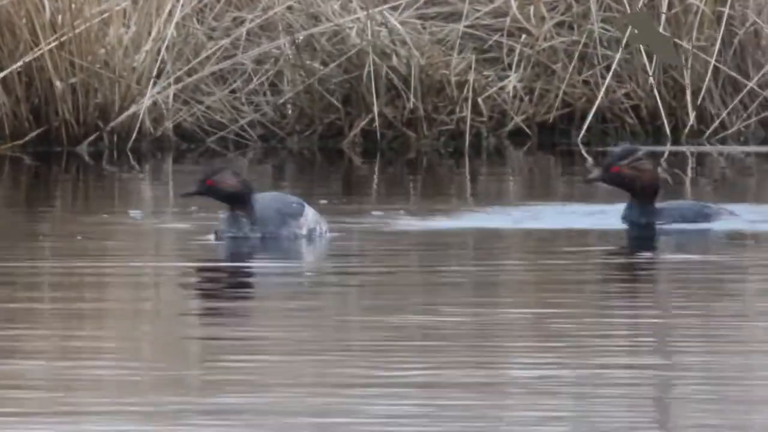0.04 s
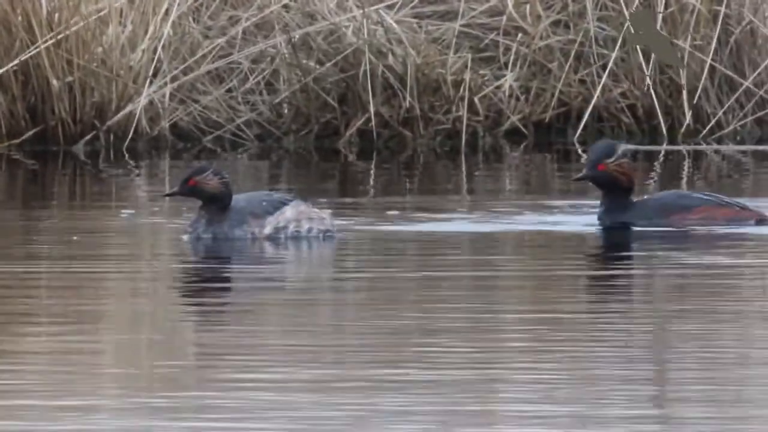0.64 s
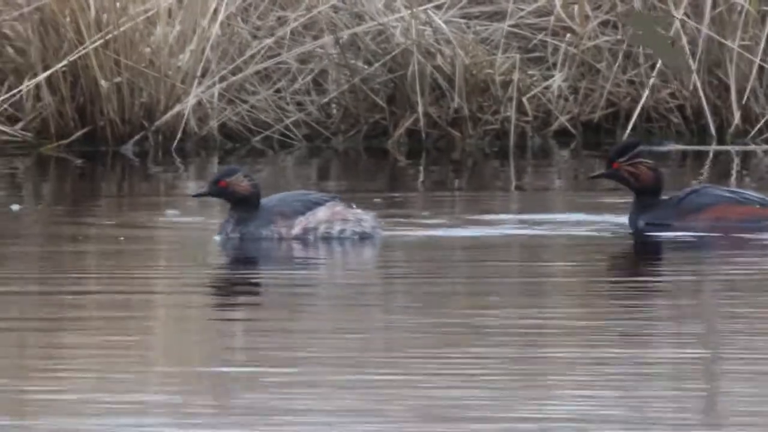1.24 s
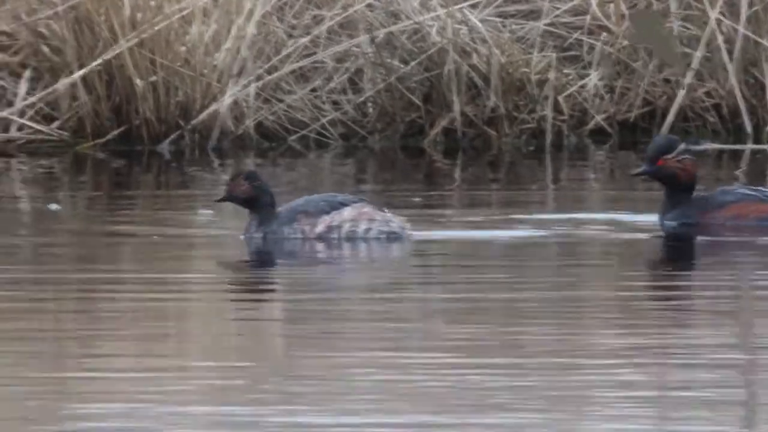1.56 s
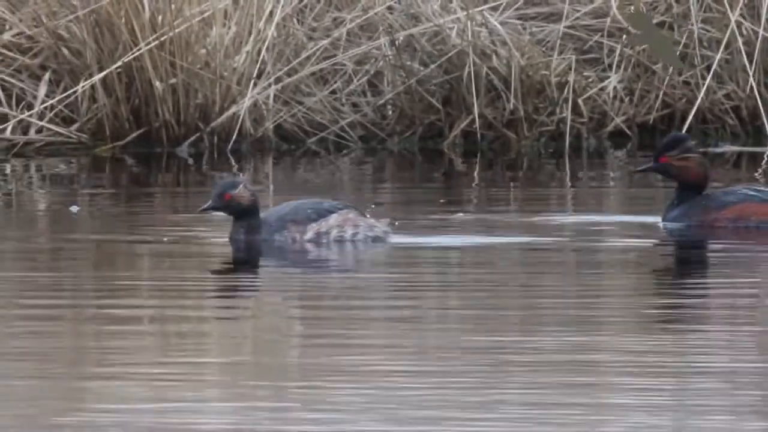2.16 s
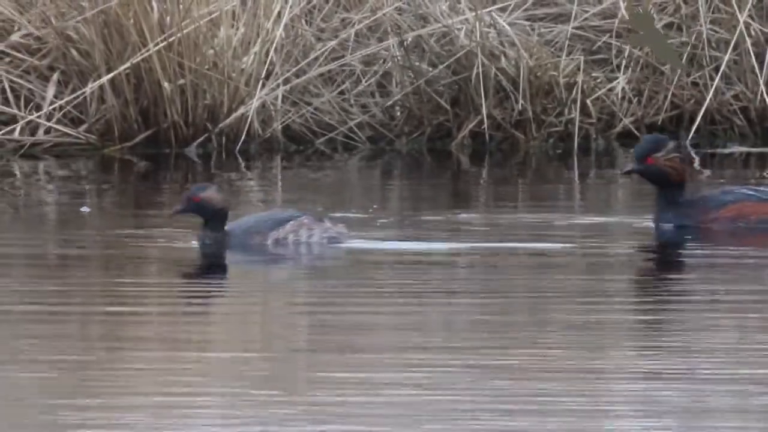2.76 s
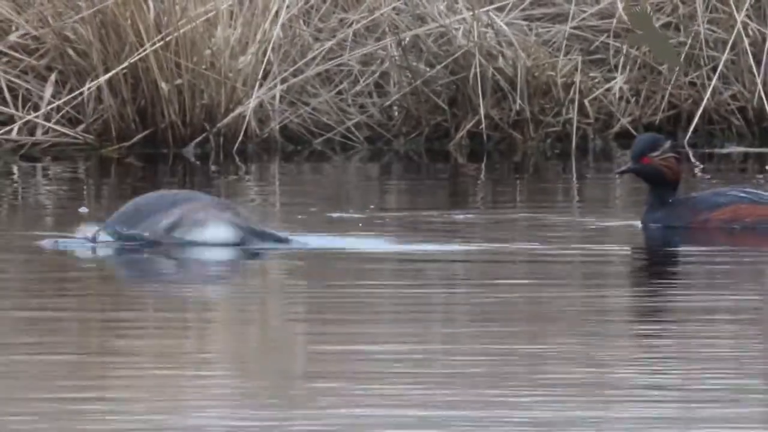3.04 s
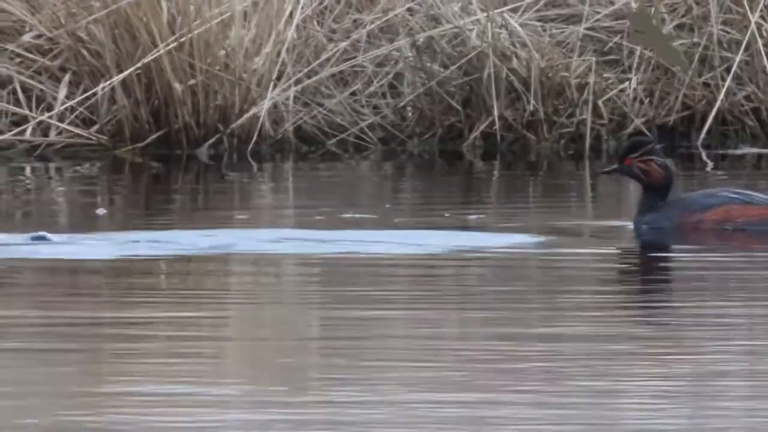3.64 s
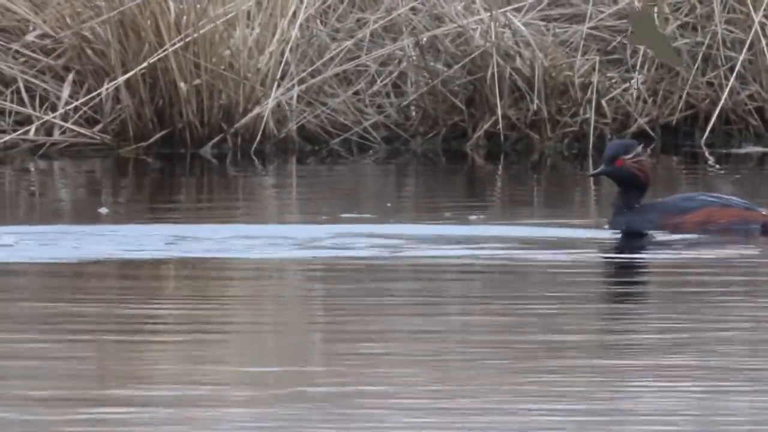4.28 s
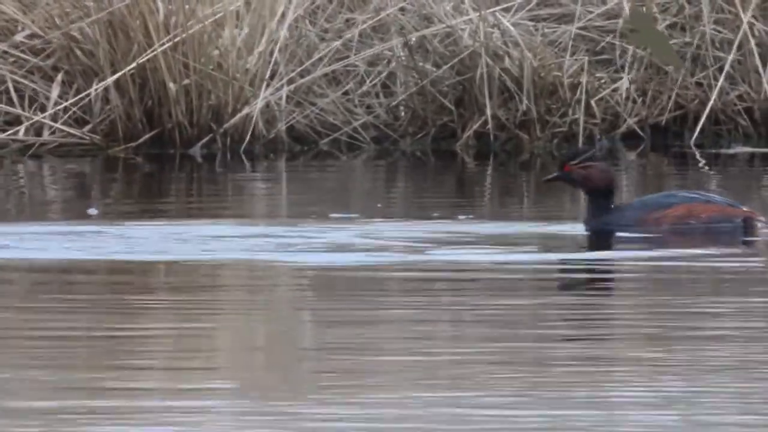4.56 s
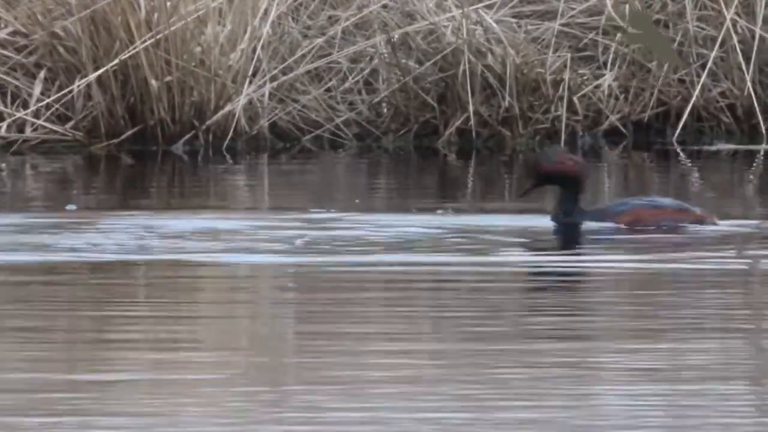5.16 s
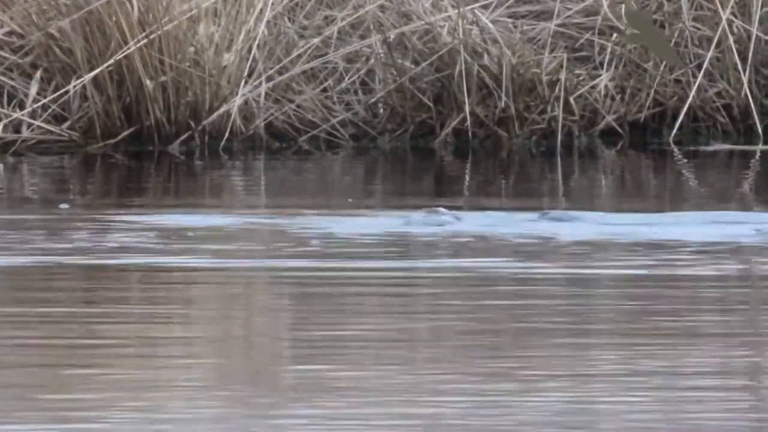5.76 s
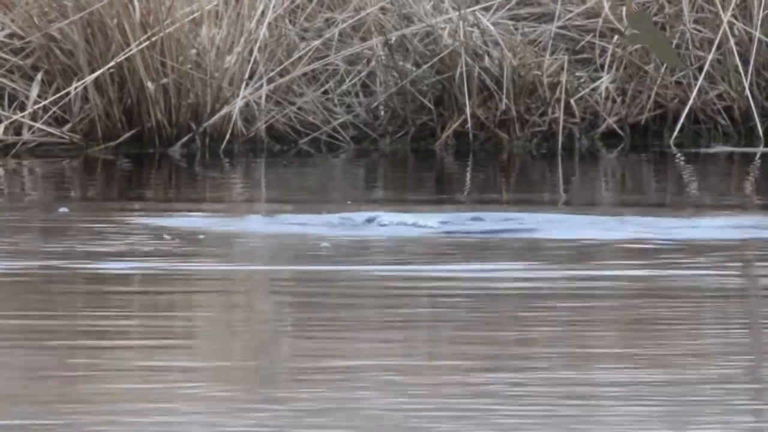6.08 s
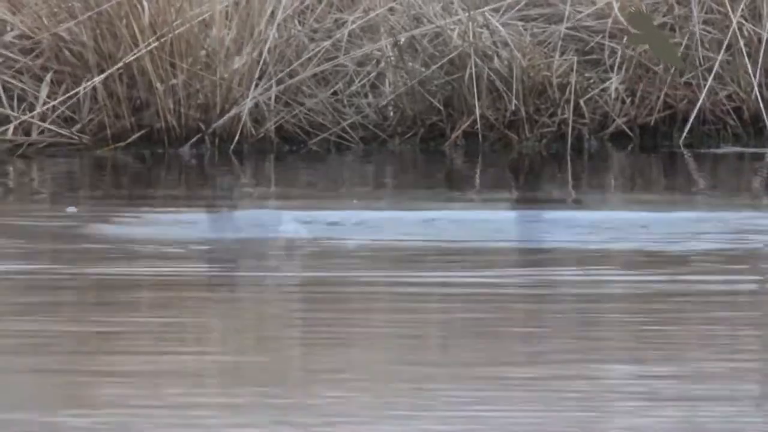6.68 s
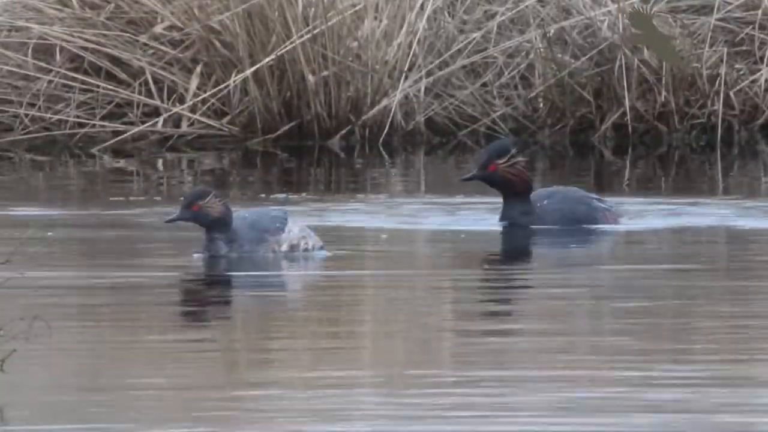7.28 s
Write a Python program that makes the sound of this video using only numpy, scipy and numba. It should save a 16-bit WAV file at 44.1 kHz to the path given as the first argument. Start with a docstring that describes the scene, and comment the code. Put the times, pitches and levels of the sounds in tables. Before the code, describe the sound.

A songbird's quick, descending whistled notes and hoarse far-off gull cries, with low wind rumble buffeting the microphone.

```python
"""A warbler sings a falling cascade of frequency-swept whistles by a marsh pool; near the end a second
stretch of warbler song fades in, high again. Further off, gulls rasp as a slow flap of the syrinx
modulates their harmonic cries, and small birds chirp; reeds and banks scatter every call into a short
echo. Turbulent gusts buffet the microphone, and the hardest blows overload it and make its limiter
duck the quiet wetland air and the hiss."""
import sys
import numpy as np
from scipy import signal
from scipy.fft import rfft, irfft
from scipy.io import wavfile
from scipy.ndimage import uniform_filter1d
from numba import njit

SR = 44100
rng = np.random.default_rng(int(sys.argv[2]) if len(sys.argv) > 2 else 0)


def put_to_file(sound):
    """Save the sound as 16-bit audio at rate SR, in the file named by the first command-line argument."""
    columns = np.atleast_2d(sound).T  # one column per channel
    safe = np.clip(columns, -1, 1)
    whole_steps = np.round(safe * 32767)
    wavfile.write(sys.argv[1], SR, whole_steps.astype(np.int16))


N = 322812
TIME = np.arange(N) / SR


def undb(db):
    """Decibels to amplitude ratio."""
    return 10 ** (np.asarray(db) / 20)


def unit(x):
    """Normalisation to rms 1."""
    return x / np.sqrt(np.mean(x ** 2))


def curve(rows):
    """Linear interpolation of (seconds, value) rows."""
    return np.interp(TIME, *np.transpose(rows))


def add(out, start_s, x):
    """Superposition: x is summed into out from start_s on."""
    i = max(int(start_s * SR), 0)
    out[i:i + len(x)] += x[:max(N - i, 0)]


def wander(rate_hz, size=N):
    """Smoothed random steps: a slow modulator with a spread near 1."""
    hold = max(int(SR / rate_hz), 1)
    steps = np.repeat(rng.standard_normal(size // hold + 2), hold)
    return 1.67 * uniform_filter1d(uniform_filter1d(steps, hold), hold)[:size]


def band(x, low_hz, high_hz):
    """Band-pass filter with gentle skirts."""
    return signal.sosfilt(signal.butter(2, [low_hz, high_hz], "band", fs=SR, output="sos"), x)


def octaves(spectrum):
    """Spectral shaping: coloured noise of rms 1, split into overlapping (centre Hz, band) octaves."""
    octave = np.log2(np.maximum(np.fft.rfftfreq(N, 1 / SR), 1))
    hz, db = np.transpose(spectrum)
    colour = undb(np.interp(octave, np.log2(hz), db))
    noise = unit(irfft(rfft(rng.standard_normal(N)) * colour, N))
    bins = rfft(noise)
    return [(2 ** k, irfft(bins * np.maximum(1 - abs(octave - k), 0), N)) for k in range(4, 15)]


def reed_echo(x, wet_db, t60_s, first_s):
    """Diffuse scattering: reeds and banks return a call as an exponentially decaying echo."""
    t = TIME[:SR]
    onset = np.clip(t / first_s - 1, 0, 1)
    tail = rng.standard_normal(SR) * np.exp(-np.log(1000) * t / t60_s) * onset
    return undb(wet_db) * signal.fftconvolve(x, tail / np.linalg.norm(tail))[:N]


# Spectrum of the open air. Each row: frequency in Hz, relative density in dB.
AIR_SPECTRUM = [(25, -23), (100, -30), (205, -4), (386, -3), (457, 2), (601, 0), (712, -3), (1160, -8.5),
                (1840, -6.5), (2420, -14), (3320, -17), (4020, -17.5), (7410, -23.5), (15500, -26.5)]
# A thin hiss that swells and drops away. Each row: time in seconds, gain in dB.
HISS_SWELL = [(0, -72), (5, -67), (5.6, -59.5), (6.1, -54.5), (6.42, -51), (6.46, -60), (7.32, -64)]


def air(rush_db=-48.5, body_db=-1):
    """Broadband noise: a distant rush whose lower bands drift, under a hiss with a soft body."""
    rush = sum(noise * undb(.5 * min(1500 / hz, 1) * wander(6)) for hz, noise in octaves(AIR_SPECTRUM))
    hiss = rng.standard_normal(N) + undb(body_db) * unit(band(rng.standard_normal(N), 400, 1180))
    return undb(rush_db) * rush + undb(curve(HISS_SWELL)) * hiss


# Faint ticks close to the microphone. Each row: start in seconds, initial level in dB.
TICKS = [(1.217, -42), (2.092, -44), (6.443, -40), (6.642, -29.5), (6.665, -34)]


def ticks(decay_s=0.0015):
    """Exponential decay: dry bursts of noise die within a few milliseconds."""
    out, t = np.zeros(N), TIME[:SR // 20]
    for start, db in TICKS:
        burst = unit(band(rng.standard_normal(len(t)), 900, 5000))
        add(out, start, undb(db) * burst * np.exp(-t / decay_s))
    return out


# Distant songbirds. Each row: start and length in seconds, first and last pitch in Hz, level in dB.
FAR_NOTES = [(0.269, 0.052, 4070, 3700, -61.5), (.75, 0.036, 3850, 4240, -62.5),
             (.41, .06, 4600, 5000, -64), (1.06, .06, 2700, 3410, -53.5), (1.53, 0.055, 3500, 3250, -65),
             (2.25, 0.06, 4000, 3900, -64), (2.965, 0.057, 4250, 4050, -51.5),
             (6.357, 0.053, 4300, 4380, -54), (6.435, 0.042, 4360, 4270, -56),
             (7.228, .045, 3420, 3280, -55)]


def far_birds(chirp_count=16, quaver=.022):
    """Frequency modulation: gliding notes quaver, among faint chirps scattered at random."""
    out = np.zeros(N)
    chirps = rng.uniform([0, .03, 3200, 3200, -67], [TIME[-1], .06, 4800, 4800, -62], (chirp_count, 5))
    for start, length, first_hz, last_hz, db in [*FAR_NOTES, *chirps]:
        size = int(length * SR)
        pitch = np.linspace(first_hz, last_hz, size) * (1 + quaver * wander(350, size))
        envelope = undb(db) * np.sqrt(2 * np.hanning(size))
        add(out, start, envelope * np.sin(2 * np.pi * np.cumsum(pitch) / SR))
    return out


# Resonances of a gull's throat and open bill. Each row: frequency in Hz, gain in dB.
GULL_THROAT = [(900, -17.5), (1500, 2), (1900, 3), (2400, -4), (2900, -6.5), (3600, -11.5), (4200, -4),
               (4750, -8), (5400, -18), (6500, -17)]


def gull(length, first_hz, middle_hz, last_hz, rasp_hz, rough, overtones_db, bend=0.031, others_db=-11):
    """Source and filter: the throat shapes an arching cry, chopped by a slower flap of the syrinx."""
    size = int(length * SR)
    progress = np.linspace(0, 1, size)
    arch_hz = np.polyval(np.polyfit([0, .5, 1], [first_hz, middle_hz, last_hz], 2), progress)
    fundamental = arch_hz / 4
    flap_hz = rasp_hz * arch_hz / middle_hz * (1 + 0.14 * rough * wander(59.5, size))
    flaps = np.cumsum(flap_hz) / SR
    pulses = abs(np.sin(np.pi * flaps)) * undb(3.2 * rough * wander(68.5, size))
    # each flap bends the pitch, and in a rough cry the voice slips out of step
    slip = .3 * rough * wander(100, size)
    phase = 2 * np.pi * np.cumsum(fundamental * (1 + bend * np.sin(2 * np.pi * flaps))) / SR + slip
    voice = 0
    for k in range(2, 12):
        throat_db = np.interp(k * fundamental, *np.transpose(GULL_THROAT))
        source_db = others_db * (k % 4 > 0) + overtones_db * (k > 5)  # every fourth harmonic rings out
        voice += undb(throat_db + source_db) * np.sin(k * phase)
    sidebands = wander(700, size) * np.sin(4 * phase) + wander(700, size) * np.cos(4 * phase)
    breath = undb(-17) * unit(band(rng.standard_normal(size), 1480, 2840))
    swell = abs(np.sin(np.pi * progress)) ** 0.37
    return unit(pulses * (unit(voice) + .75 * rough * sidebands + breath)) * swell


# Gull cries. Each row: start and length in seconds, first, middle and last frequency of the fourth
# harmonic in Hz, rasp pulses per second, level in dB, roughness from 0 to 1, overtone gain in dB.
GULL_CRIES = [ (0, 0.15, 2000, 1840, 1486, 80, -48, .6, -3),
              (0.382, .21, 2253, 2626, 2560, 105, -47, 0.43, -8),
              (.57, 0.22, 2460, 2390, 2217, 98, -50.5, 0.28, -15),
              (.575, 0.067, 2080, 1853, 1560, 90, -47.5, .2, -10),
              (0.799, 0.45, 2350, 1952, 1648, 90, -52.5, 0.5, -5),
              (1.579, 0.28, 2550, 2727, 2600, 100, -51, 0.72, -10),
              (1.845, .3, 2293, 2160, 1820, 90, -50.5, 0.49, -18),
              (1.968, 0.14, 1980, 1883, 1680, 75, -46, 0.24, -20),
              (2.13, 0.42, 1730, 1786, 1580, 85, -50, 0.42, -19),
              (2.48, .17, 1906, 2064, 1790, 68, -39, 0.4, -9.5),
              (2.823, 0.41, 2035, 2425, 2123, 95, -50.5, 0.68, -8),
              (2.938, 0.31, 1653, 1834, 1743, 80, -48, 0.42, -2),
              (3.179, .15, 2000, 1934, 1490, 72, -43, 0.44, -21),
              (3.26, .24, 1582, 1920, 1737, 78, -41.5, 0.4, -10),
              (3.57, 0.22, 2100, 2330, 2340, 95, -54, 0.45, -11),
              (3.679, .23, 1500, 1937, 1335, 74, -44, 0.5, -10),
              (3.98, .4, 1756, 1905, 1754, 85, -51, 0.77, 1),
              (4.076, 0.19, 2270, 2555, 2630, 105, -45.5, .37, -7),
              (4.253, .36, 2380, 2316, 2200, 98, -48, 0.33, 2.5),
              (4.471, .31, 1860, 1859, 1611, 43, -42.5, 0.28, -13),
              (4.684, 0.26, 2413, 2160, 1992, 46, -50.5, .4, -2),
              (5.048, 0.45, 2020, 1818, 1826, 85, -52.5, 0.47, 1),
              (5.47, 0.34, 2124, 2432, 2070, 100, -43.5, 0.33, -4.5),
              (5.54, .24, 1800, 1810, 1610, 80, -51.5, 0.52, -10),
              (6.237, 0.057, 2605, 2550, 2400, 90, -44.5, 0.75, -8), ]


def colony(murmur_db=-60):
    """Incoherent summation: many gulls blur into a band of noise behind the nearer cries."""
    din = unit(band(band(rng.standard_normal(N), 1520, 2340), 1140, 2740))
    out = din * undb(murmur_db + 2 * wander(6.76) + 2 * wander(70))
    for start, length, first, middle, last, rasp_hz, db, rough, overtones_db in GULL_CRIES:
        add(out, start, undb(db) * gull(length, first, middle, last, rasp_hz, rough, overtones_db))
    return out


# The breeze between gusts. Each row: time in seconds, relative level in dB.
BREEZE = [(0.0, -28), (0.57, -22), (1.0, -37.5), (1.53, -40), (1.83, -50), (3.14, -53), (3.79, -47),
          (4.18, -40.5), (4.3, -29.5), (4.63, -38), (4.81, -34), (5.0, -24), (5.36, -27.5), (5.53, -31),
          (5.95, -38), (6.2, -34.5), (6.73, -20), (7.32, -16.5)]
# Gusts on top of it. Each row: start and hold in seconds, relative level in dB.
GUSTS = [(.005, 0.044, -24), (0.146, 0.062, -20), (0.309, 0.046, -15), (0.543, 0.029, -22),
         (0.618, 0.073, -19), (0.756, 0.022, -23.5), (.94, 0.11, -31.5), (1.124, 0.013, -31),
         (1.215, .05, -33.5), (1.602, .025, -33.5), (3.88, .06, -39), (4.12, 0.13, -34),
         (4.279, 0.058, -25), (4.81, 0.073, -19.5), (5.052, 0.045, -21.5), (5.168, 0.058, -18.5),
         (5.26, 0.062, -17), (5.429, 0.11, -17.5), (5.674, 0.0084, -26.5), (5.776, .12, -29),
         (6.244, 0.027, -18.5), (6.338, 0.089, -29.5), (6.517, 0.14, -13.5), (6.814, 0.14, -15.5),
         (7.008, 0.06, -18.5), (7.194, 0.052, -13), (7.301, .02, -12.5)]


def flow_db(breeze_db=-1.5, attack_s=0.011, release_s=.018):
    """Addition of powers: each gust builds, holds and dies back into the breeze."""
    power = undb(curve(BREEZE) + breeze_db) ** 2
    for start, hold, db in GUSTS:
        outside_hold = np.maximum((start - TIME) / attack_s, (TIME - start - hold) / release_s)
        power += (undb(db) * np.exp(-np.clip(outside_hold, 0, 20))) ** 2
    return 10 * np.log10(power)


# Spectrum of the wind's rumble. Each row: frequency in Hz, relative density in dB.
WIND_SPECTRUM = [(20, -5), (40, 0.5), (66, 4), (134, 2.5), (208, -3), (350, -12.5), (550, -26), (750, -33),
                 (1150, -53.5), (1700, -66), (2900, -100)]


def wind(gain_db=-1, eddy_db=4.0, brighten=0.17, strong_db=-21, knee_hz=110):
    """Turbulence comes in quick eddies; stronger flow sheds smaller ones, so the rumble brightens."""
    out, strength = np.zeros(N), flow_db()
    eddies = eddy_db * np.tanh(wander(90))
    for hz, noise in octaves(WIND_SPECTRUM):
        octaves_up = np.clip(np.log2(hz / knee_hz), -2, 3)
        tilt_db = brighten * octaves_up * (strength - strong_db)
        flicker_db = eddies * (1 + .5 * octaves_up) + 0.14 * wander(53)
        out += noise * undb(strength + tilt_db + flicker_db)
    return undb(gain_db) * out


# Single eddies that thump the microphone. Each row: centre in seconds, swing peak in dB, pitch in Hz.
EDDIES = [(.028, -11.5, 171), (0.145, -12, 162), (0.181, -15.5, 241), (.338, -10.5, 400),
          (.407, -17.5, 335), (0.452, -14.5, 189), (.625, -15, 110), (0.689, -5.5, 135), (.76, -20, 427),
          (1.6, -28.5, 108), (3.459, -29.5, 61), (4.325, -11, 147), (4.875, -7.5, 236), (4.891, 3.5, 138),
          (5.201, -9.5, 189), (5.445, -10.5, 234), (5.497, -8.5, 126), (5.778, -15.5, 150),
          (6.242, -17.5, 140), (6.515, -21, 273), (6.553, -7.5, 169), (6.622, -12.5, 273), (6.643, 5, 198),
          (6.821, -5.5, 295), (6.939, 3, 133), (7.031, 9.5, 304), (7.195, -12, 208), (7.223, -9, 370),
          (7.238, -13.5, 161)]


def buffets(wake_gain=0.19, wake_cycles=1.74):
    """Bipolar pressure pulse: each eddy sucks, pushes and leaves a short turbulent wake."""
    out, t = np.zeros(N), TIME[:SR // 10] - .03
    for centre, db, hz in EDDIES:
        angle = 2 * np.pi * hz * t
        swing = angle * np.exp((1 - angle ** 2) / 2)
        wake_hz = hz / 2, hz * 3.16
        wake = unit(band(band(rng.standard_normal(len(t)), *wake_hz), *wake_hz))
        envelope = np.exp(np.minimum(angle / 2, -t * hz / wake_cycles))
        add(out, centre + t[0], undb(db) * (swing + wake_gain * wake * envelope))
    return out


# The warbler's syllable shapes, by name. Each row: share of the length, height from 0 (lowest pitch)
# to 1 (highest), gain in dB.
SYLLABLES = { "hook": [(0, 1, -17), (.15, .92, -10), (.38, .87, -7), (.5, .73, -3.5), (.78, .7, -1),
             (.93, .25, 0.5), (1, 0, -5)], "swoop": [(0, 1, -21), (.2, 0.186, -3.5), (.3, 0.0081, -15),
             (.5, 0.045, -14), (.66, .22, 1), (.85, 0.49, -6.5), (1, 0.78, -18)], "slur": [(0, 0.83, -19),
             (.08, .94, -5), (.3, .89, 1), (.62, 0.65, -6.5), (.86, .28, -1), (1, 0.0098, -10)],
             "arch": [(0, .54, -20), (.13, .48, -7.5), (.36, .52, -3.5), (.6, .87, -1.5), (.74, 1, 1),
             (.86, .68, -2.5), (1, 0.086, -9.5)], "scoop": [(0, .47, -11), (.14, .44, -1),
             (.43, 0.081, 0.5), (.57, 0, -3), (.7, .12, -4), (.91, .58, 0), (1, 1, -4)],
             "slide": [(0, 1, -17), (.17, .76, -4), (.42, .64, -4), (.68, .47, 5), (.86, .18, -6.5),
             (1, 0.015, -8)], "rise": [(0, .02, -15), (.2, 0, -9.5), (.33, .2, 2), (.46, .32, -2),
             (.7, .42, -2), (.85, .65, -4.5), (1, 0.99, -2.5)], "shoulder": [(0, 0.93, -20), (.17, .76, -6),
             (.38, .81, -3), (.58, .55, 3.5), (.75, .2, -18), (1, 0, -19)], "peak": [(0, .23, -18),
             (.27, .92, -7), (.47, 0.99, -13), (.56, .48, -18), (.65, .38, 0), (.86, 0.23, 1.5),
             (1, 0, -8.5)], "creep": [(0, .1, -9), (.12, 0, 1.5), (.6, .3, -3), (.82, 0.98, -0.5),
             (.92, .63, 2.5), (1, 0.34, -11)], "step": [(0, 0.96, -6), (.3, .9, -3), (.48, .4, 0),
             (.82, .15, 1), (1, 0, -7)], }
# A falling cascade of whistles; near the end a second stretch of song fades in, high again. Each row:
# start in seconds, shape name, length in seconds, lowest and highest pitch in Hz, base level in dB.
SONG = [ (2.875, "hook", 0.054, 4400, 7200, -59), (3.003, "hook", .05, 6800, 7200, -62),
        (3.119, "hook", 0.051, 5320, 7240, -49), (3.232, "hook", 0.071, 4700, 7300, -47.5),
        (3.378, "hook", 0.077, 4250, 7120, -45), (3.527, "hook", 0.085, 4070, 7170, -43),
        (3.673, "swoop", 0.073, 4060, 6500, -30), (3.815, "swoop", 0.078, 3940, 6400, -31.5),
        (3.96, "slur", 0.11, 3260, 5220, -35), (4.149, "slur", 0.12, 3230, 5120, -35),
        (4.338, "arch", 0.12, 2695, 4250, -35.5), (4.541, "scoop", .13, 2980, 4320, -35),
        (4.755, "scoop", 0.12, 2930, 4200, -44), (4.956, "slide", 0.15, 3070, 4870, -41),
        (5.185, "rise", 0.11, 3120, 5380, -40), (5.362, "shoulder", 0.1, 3020, 4200, -34.5),
        (5.527, "shoulder", .097, 2800, 4150, -36.5), (5.697, "rise", 0.113, 3040, 5700, -41),
        (5.884, "rise", 0.11, 3040, 5900, -45), (6.084, "slur", 0.093, 2800, 4090, -48),
        (6.233, "creep", .12, 2650, 3540, -48), (6.435, "step", 0.083, 4950, 7150, -48.5),
        (6.587, "peak", .1, 4630, 6830, -41), (6.76, "peak", 0.099, 4540, 6840, -36.5),
        (6.93, "arch", 0.1, 3670, 4820, -38.5), (7.103, "arch", 0.1, 3570, 4730, -36),
        (7.278, "arch", .1, 3630, 4750, -43), ]


def warbler(glide_s=0.003, waver=0.0019, flutter_db=1.94, edge_s=0.0028):
    """Frequency sweep: each syllable is a pure tone that follows its shape and wavers a little."""
    out = np.zeros(N)
    for start, shape, length, low_hz, high_hz, db in SONG:
        share, height, shape_db = np.array(sorted(map(tuple, SYLLABLES[shape]))).T
        t = np.arange(-edge_s, length + edge_s, 1 / SR)
        contour = low_hz + (high_hz - low_hz) * np.interp(t / length, share, height)
        pitch = uniform_filter1d(contour, int(glide_s * SR)) * (1 + waver * wander(304, len(t)))
        gate = np.clip(np.minimum(t - t[0], t[-1] - t) / edge_s, 0, 1)
        level_db = db + np.interp(t / length, share, shape_db) + flutter_db * wander(185.6, len(t))
        tone = np.sqrt(2) * np.sin(2 * np.pi * np.cumsum(pitch) / SR)
        add(out, start + t[0], gate * undb(level_db) * tone)
    return out


def scene(cavity_db=3):
    """Superposition: birds and their echoes across the water, wind at the microphone."""
    song, calls = warbler(), colony() + far_birds()
    near = song + reed_echo(song, wet_db=-9, t60_s=0.18, first_s=0.0014)
    near += reed_echo(song, wet_db=-36, t60_s=0.77, first_s=0.028)
    distant = calls + reed_echo(calls, wet_db=-9, t60_s=.35, first_s=.008)
    rumble = wind() + buffets()
    cavity = undb(cavity_db) * band(rumble, 1044, 1154)  # the cavity in front of the microphone rings
    return (near + distant + rumble + cavity + ticks() + air())[None]


@njit
def follow(x, attack, release):
    """Envelope detection: one-pole smoothing with separate rates of rise and fall."""
    out, level = np.empty(len(x)), 0.
    for i in range(len(x)):
        level += (x[i] - level) * (attack if x[i] > level else release)
        out[i] = level
    return out


def record(dry, attack_s=0.0024, release_s=0.31, ceiling=0.7, hardness=8, cutoff_hz=15850):
    """Limiting and saturation: hard thumps flatten and duck the gain; a low-pass cuts the top."""
    envelope = follow(abs(dry[0]), 1 / (attack_s * SR), 1 / (release_s * SR))
    limited = dry * ceiling / np.maximum(envelope, ceiling)
    flattened = limited / (1 + limited ** hardness) ** (1 / hardness)
    fade = np.clip((TIME[-1] - TIME) / .003, 0, 1)
    return signal.sosfilt(signal.ellip(10, .1, 80, cutoff_hz, fs=SR, output="sos"), flattened * fade)


dry = scene()
out = record(dry)
put_to_file(out)
```